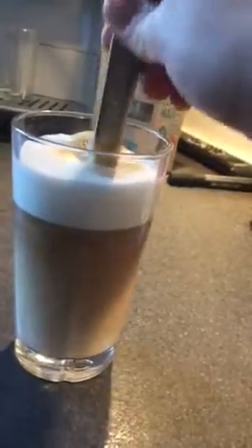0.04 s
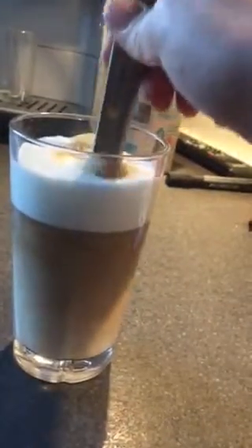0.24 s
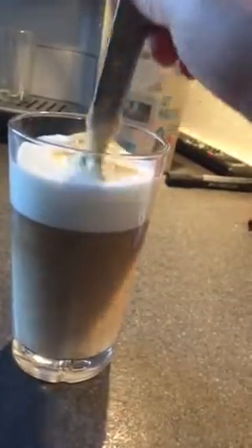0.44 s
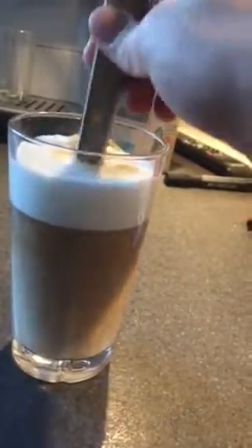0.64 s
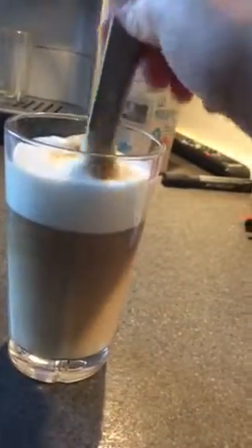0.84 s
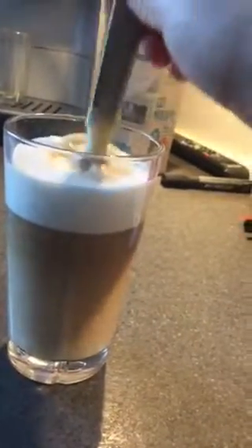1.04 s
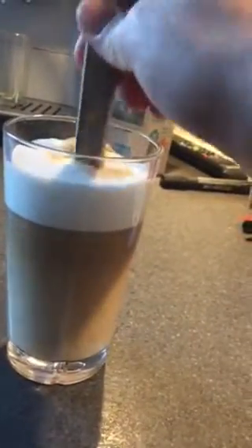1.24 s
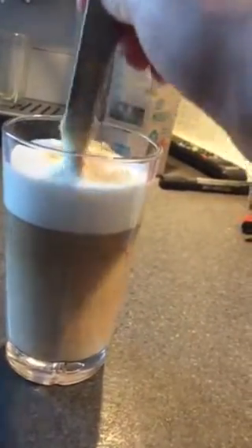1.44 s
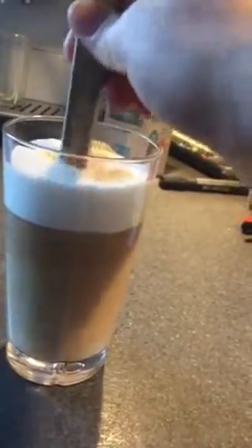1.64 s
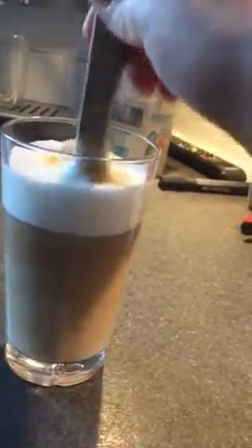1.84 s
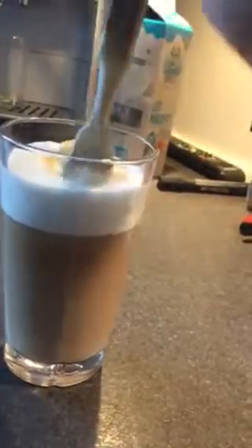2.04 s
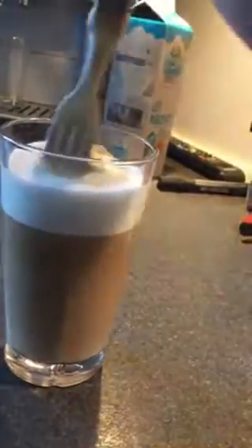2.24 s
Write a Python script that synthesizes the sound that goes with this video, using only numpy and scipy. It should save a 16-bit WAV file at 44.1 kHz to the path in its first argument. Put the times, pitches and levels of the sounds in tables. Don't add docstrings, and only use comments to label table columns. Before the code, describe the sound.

A metal fork stirs a drink in a tall glass, making short, damped knocks and clinks. Knocks fall near 0.05, 0.25, 0.6 and 0.8 seconds, strongest at 1.2. A soft liquid swish peaks at 1.3, then brighter clinks around 1.4 and lighter taps at 1.75 to 1.9. The counter thuds and hums low; after 2 seconds only faint room noise remains. Close phone microphone, small hard kitchen.

```python
import sys
import numpy as np
from scipy import signal
from scipy.fft import rfft, irfft
from scipy.io import wavfile
from scipy.ndimage import uniform_filter1d

SR = 44100
rng = np.random.default_rng(int(sys.argv[2]) if len(sys.argv) > 2 else 0)


def int16_out(signal):
    q = np.round(np.clip(np.atleast_2d(signal).T, -1, 1) * 32767)
    wavfile.write(sys.argv[1], SR, q.astype(np.int16))


def linear_from_db(decibels):
    return 10 ** (np.asarray(decibels, float) / 20)


N = 101429
T = np.arange(SR // 4) / SR


def band(x, lo_hz, hi_hz):
    return signal.sosfilt(signal.butter(2, [lo_hz, hi_hz], "band", fs=SR, output="sos"), x)


def coloured(spectrum):
    f_hz = np.fft.rfftfreq(N, 1 / SR) + 1
    hz, db = np.array(spectrum).T
    gain = linear_from_db(np.interp(np.log(f_hz), np.log(hz), db))
    x = irfft(rfft(rng.standard_normal(N)) * gain, N)
    return x / x.std()


def walk(rate_hz):
    k = int(SR / rate_hz)
    x = uniform_filter1d(uniform_filter1d(rng.standard_normal(N), k), k)
    return x / x.std()


def swells(events):
    t = np.arange(N) / SR
    total = np.zeros(N)
    for peak_s, rise_s, fall_s, db in events:
        width_s = np.where(t < peak_s, rise_s, fall_s)
        total += linear_from_db(db) * np.exp(-2 * ((t - peak_s) / width_s) ** 2)
    return total


def ring(modes, drive, scale=0.99, smear=0.93):
    blur_rad, scatter_db, detune, rise_cycles = 0.042, 1.5, 0.004, 1.6
    hz, db, t60_s = np.array(modes).T[:, :, None]
    hz = hz * scale
    level_draw, pitch_draw = rng.standard_normal((2, len(hz), 1))
    wander = np.cumsum(rng.standard_normal((len(hz), len(T))), axis=1)
    blur = smear * blur_rad * np.sqrt(hz / 2000) * wander
    decay = linear_from_db(db + scatter_db * level_draw - 60 * T / t60_s)
    onset = 1 - np.exp(-T * hz / rise_cycles)
    y = decay * onset * np.sin(2 * np.pi * hz * (1 + detune * pitch_draw) * T + blur)
    y = signal.fftconvolve(y.sum(0), drive)[:len(T)]
    return y / np.abs(y).max()


def add(out, s, x):
    i = int(s * SR)
    out[i:i + len(x)] += x[:N - i]


def quiet_floor():
    # (f/Hz, density/dB)
    spectrum = [(15, -47), (27, -19), (58, -12), (87, 0), (206, -6), (516, -10.5), (936, -15.5),
                (1070, -13.5), (16000, -24.5)]
    return linear_from_db(-71.5 + 0.4 * walk(5.1)) * coloured(spectrum)


def hand():
    # (t/s, level/dB)
    level = [
        (0, -80),
        (1.4, -75),
        (1.45, -68),
        (1.7, -77.5),
        (2.3, -81),
    ]
    x = band(rng.standard_normal(N), 44.2, 93.6)
    return x / x.std() * linear_from_db(np.interp(np.arange(N) / SR, *np.array(level).T))


def liquid():
    # (peak/s, rise/s, fall/s, level/dB)
    swishes = [
        (.04, 0.021, 0.012, -67),
        (.54, .04, 0.11, -79.5),
        (.975, 0.049, 0.046, -68.5),
        (1.1, 0.18, 0.08, -69.5),
        (1.172, 0.024, 0.025, -63),
        (1.21, 0.008, 0.037, -65),
        (1.325, 0.059, 0.064, -54.5),
        (1.415, 0.034, 0.015, -75.5),
        (1.72, 0.015, 0.05, -72),
        (2.272, .006, 0.0051, -93),
    ]
    # (f/Hz, density/dB)
    spectrum = [(290, -49), (500, -30), (773, -13.5), (880, -14), (1870, -6), (3390, -14), (5970, -16),
                (16000, -31.5)]
    return swells(swishes) * coloured(spectrum) * linear_from_db(2.4 * walk(400))


def counter_hum():
    # (peak/s, rise/s, fall/s, level/dB)
    sways = [
        (.05, 0.1, .06, -72),
        (.27, 0.03, 0.17, -57.5),
        (.665, 0.045, 0.1, -53),
        (.83, 0.03, 0.13, -53),
        (1.11, 0.022, 0.018, -57),
        (1.25, 0.1, 0.062, -51.5),
        (1.5, 0.092, .06, -67.5),
        (1.61, 0.075, 0.12, -65),
        (1.83, 0.074, 0.11, -66),
        (2.04, 0.068, 0.012, -57),
    ]
    pitch_hz = 122 * (1 + 0.05 * walk(28.2))
    hum = np.sin(2 * np.pi * np.cumsum(pitch_hz) / SR) * linear_from_db(3.5 * walk(29))
    return swells(sways) * hum


def counter_blows():
    # (t/s, thud/dB, cup ring/dB)
    knocks = [(0.052, -49, -61), (0.248, -27, -51), (0.27, -43.5, -73), (0.307, -51, -73),
              (.372, -46, -49.5), (.617, -41, -47.5), (0.812, -31.5, -55.5), (.828, -40, -52.5),
              (0.853, -72, -57.5), (0.867, -49, -82), (0.899, -55, -71), (1.057, -58, -75),
              (1.099, -60.5, -73), (1.182, -43, -48.5), (1.215, -49, -93), (1.424, -42, -51),
              (1.57, -61.5, -98), (1.604, -61, -79), (1.742, -55.5, -67.5), (1.812, -56, -65),
              (1.9, -48, -52), (2.021, -61.5, -88)]
    # (f/Hz, level/dB, t60/s)
    counter_modes = [(152.9, -6, 0.13), (208, -10.5, 0.21), (283.2, -4.5, 0.13), (340.6, -10, 0.4),
                     (351.5, 7.5, 0.048), (360.7, -1, 0.077)]
    # (f/Hz, level/dB, t60/s)
    cup_modes = [(620, -1, .12), (715.8, 3, 0.16), (773, -15, 0.3)]
    push_s, sway_s = 0.0005, 0.015
    deep_hz, deep_slope, hard_db = 250, 0.4, -27
    thud, cup = np.zeros((2, N))
    push = T[:400] * np.exp(-T[:400] / push_s)
    for s, thud_db, cup_db in knocks:
        rattle = linear_from_db(-30) * rng.standard_normal(4096) * np.exp(-T[:4096] / sway_s)
        rattle[0] = 1
        deep_db = deep_slope * (thud_db - hard_db)
        modes = [(hz, db + (hz < deep_hz) * deep_db, t60_s) for hz, db, t60_s in counter_modes]
        add(thud, s, linear_from_db(thud_db + 1.5) * ring(modes, np.convolve(push, rattle), smear=3))
        add(cup, s, linear_from_db(cup_db + 1.5) * ring(cup_modes, push[:40]))
    thud = band(band(thud, 73.3, 480), 73.3, 480)
    return thud + band(cup, 464, 1500)


def contact(steel_db, tick_db):
    # (f/Hz, level/dB, t60/s)
    steel_modes = [(4370, -7, 0.0092), (5510, -33.5, 0.053), (5356, -4, 0.015), (5636, -13, 0.061),
                   (5960, -0.5, 0.01), (6510, -16, 0.014), (7140, -11.5, 0.0082)]
    chatter_s, tine_lag_s = 0.006, 0.00076
    tick_t60_s, tick_rise_s, stir_t60_s = 0.011, 0.0008, 0.12
    bounce, chance = rng.standard_normal((2, 1024))
    force = linear_from_db(-20) * bounce * (chance > 2) * np.exp(-T[:1024] / chatter_s)
    force[0] = linear_from_db(-11)
    force[int(tine_lag_s * SR)] = 1
    burst = rng.standard_normal(len(T)) * linear_from_db(-60 * T / tick_t60_s) * np.minimum(T / tick_rise_s, 1)
    tick_hz = 9860 * 2 ** (min(tick_db + 8, 3) / 16)
    lo_hz, hi_hz = tick_hz * 0.52, tick_hz * 1.48
    tick = band(band(burst, lo_hz, hi_hz), lo_hz, hi_hz) * linear_from_db(tick_db + 6)
    crack = band(burst, 1368, 7106) * linear_from_db(steel_db + 7)
    stir = band(rng.standard_normal(len(T)), 1200, 8200) * np.minimum(T / chatter_s, 1)
    stir = stir * linear_from_db(steel_db - 11 - 60 * T / stir_t60_s)
    steel = linear_from_db(steel_db + 3) * ring(steel_modes, force)
    return force, tick + crack + stir + steel


def strike(hits, glass_modes):
    out = np.zeros(N)
    for s, db, hz, steel_db, tick_db in hits:
        force, bright = contact(steel_db, tick_db)
        add(out, s, linear_from_db(db + 3.5) * (ring(glass_modes, force, hz) + bright))
    return out


def fork_rings():
    # (t/s, level/dB, f/Hz, t60/s)
    rings = [(0.047, -41.5, 1590, 0.083), (.046, -44.5, 782, 0.031), (0.046, -45.5, 2352, 0.17),
             (0.248, -37, 1690, 0.048), (0.251, -46, 1863, 0.076), (0.248, -48, 1124, .15),
             (0.248, -53, 1600, 0.069), (.249, -49, 2070, 0.09), (0.372, -53.5, 1280, 0.055),
             (0.619, -45.5, 1421, 0.18), (0.617, -34.5, 2840, 0.041), (0.615, -33.5, 1830, 0.022),
             (.618, -39, 2073, .05), (0.812, -37, 7080, 0.017), (0.824, -51, 3850, 0.07),
             (1.182, -27, 1459, 0.033), (1.181, -34, 2634, 0.098), (1.182, -25.5, 1860, 0.03),
             (1.423, -34.5, 2420, 0.037), (1.46, -42.5, 2034, 0.025), (1.736, -41.5, 1302, 0.052),
             (1.739, -55, 2660, 0.088), (1.736, -51, 2073, 0.081), (1.736, -54, 3810, 0.071),
             (1.736, -46, 6500, 0.025), (1.898, -59, 5770, .03), (1.898, -46, 3410, .03),
             (1.812, -47.5, 4040, 0.04), (1.813, -52.5, 2500, 0.082), (1.812, -53, 4960, 0.019),
             (1.82, -56.5, 3440, 0.07)]
    # (multiple of f, level/dB)
    side_modes = [(1.06, -8), (.93, -10)]
    out = np.zeros(N)
    for s, db, hz, t60_s in rings:
        modes = [(hz, 0, t60_s)] + [(hz * k, side_db, t60_s / 2) for k, side_db in side_modes]
        add(out, s, linear_from_db(db - 1.5) * ring(modes, np.hanning(12)))
    return out


def wall_clinks():
    # (t/s, level/dB, pitch/Hz, steel re level/dB, tick re level/dB)
    hits = [(0.3678, -39, 2620, -7.5, -4), (0.3735, -55.5, 2550, -1.5, -12),
            (0.4101, -46.5, 2258, -10, -8.5), (0.4263, -45.5, 2265, -13, -9.5),
            (0.9106, -46.5, 2510, -10, -4), (.9705, -56.5, 2580, -6, -2.5),
            (1.4229, -31.5, 2612, -10.5, -9), (1.4565, -55, 2500, -24, -28), (1.4585, -37, 2506, -3.5, -3),
            (1.4763, -43.5, 2366, -9, -8), (1.8115, -48.5, 2530, -23, -13), (1.8973, -35, 2446, -12, -9.5),
            (1.9208, -43.5, 2363, -14, -11)]
    # (multiple of pitch, level/dB, t60/s)
    modes = [(.9, -7, .018), (1.001, 0, .017), (.97, -21, .075), (1.09, -6, .018), (1.55, -20, .015),
             (.56, -18, .03)]
    return strike(hits, modes)


def base_knocks():
    # (t/s, level/dB, pitch/Hz, steel re level/dB, tick re level/dB)
    hits = [(0.0447, -43.5, 2300, -0.5, 0.5), (0.0508, -62, 2310, 2, 8), (0.0535, -41.5, 2284, -10, -18),
            (0.2473, -33.5, 2160, -13, -10), (0.2613, -42.5, 2050, -7, -25), (0.617, -32, 2155, -3.5, -3),
            (0.8118, -37.5, 2350, -17, -14), (.8205, -43, 2210, -15, -19), (0.835, -51, 2390, -11, -20),
            (1.1802, -27, 2420, -3.5, -4.5), (1.21, -48, 2540, -14, -8), (1.7341, -49.5, 2305, -5.5, -3),
            (1.7446, -52.5, 2445, -10, -18)]
    # (multiple of pitch, level/dB, t60/s)
    modes = [(.4, -20, .04), (.5, -17, .04), (.6, -14, .035), (.8, -9, .03), (.89, -8, .025),
             (.96, -9, .05), (1.001, 0, .022), (1.05, -12, .06), (1.14, -7, .025)]
    return strike(hits, modes)


def fork():
    return band(base_knocks() + wall_clinks() + fork_rings(), 500, 18000)


def room(x):
    low_t60_s, top_t60_s, gap_s = 0.29, 0.26, 0.0044
    low, top = rng.standard_normal((2, len(T)))
    tail = band(low, 200, 3500) * linear_from_db(-60 * T / low_t60_s)
    tail = tail + band(top, 2900, 12700) * linear_from_db(-60 * T / top_t60_s)
    tail = tail * (T > gap_s)
    return signal.fftconvolve(x, tail / np.sqrt(np.sum(tail ** 2)))[:N] * linear_from_db(-13.5)


def scene():
    near = fork() + liquid()
    counter = counter_blows() + counter_hum()
    return (near + room(near) + counter + hand() + quiet_floor())[None]


def roll_off(x):
    return signal.sosfilt(signal.butter(12, 16830, fs=SR, output="sos"), x)


def record(dry):
    mix = signal.sosfilt(signal.butter(6, 15900, fs=SR, output="sos"), dry)
    return roll_off(mix)


dry = scene()
out = record(dry)
int16_out(out)
```